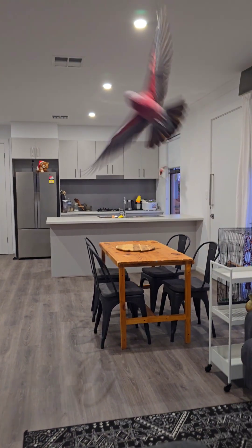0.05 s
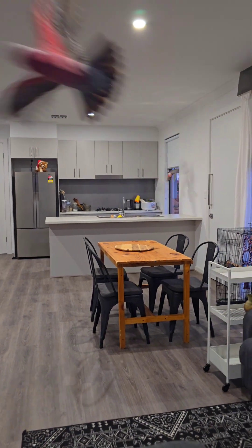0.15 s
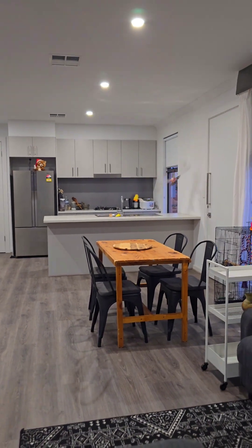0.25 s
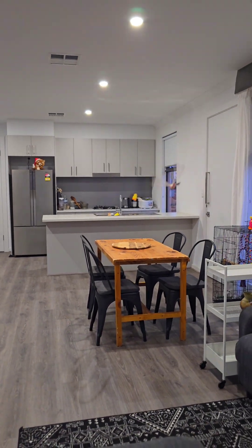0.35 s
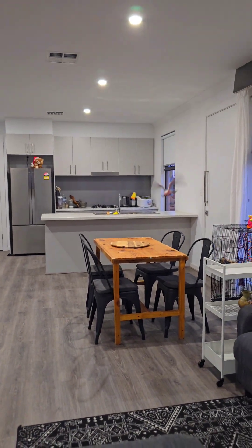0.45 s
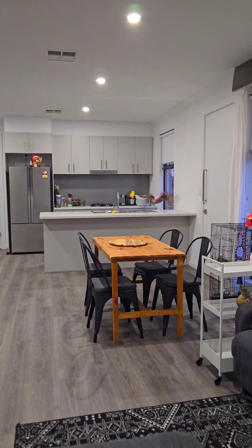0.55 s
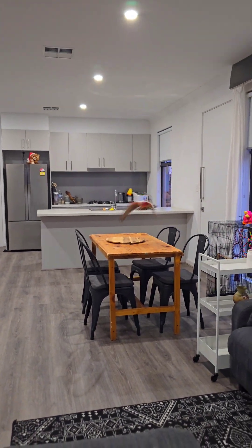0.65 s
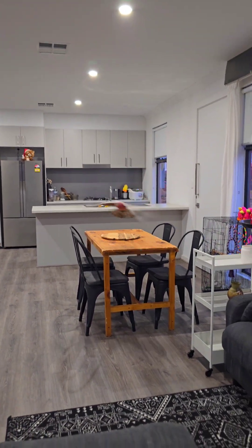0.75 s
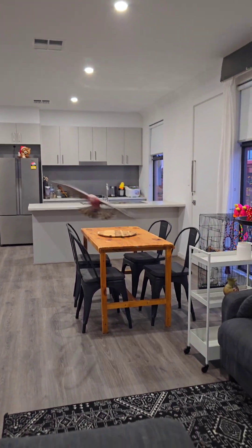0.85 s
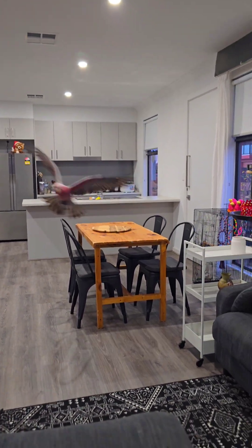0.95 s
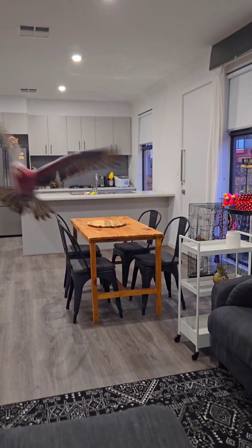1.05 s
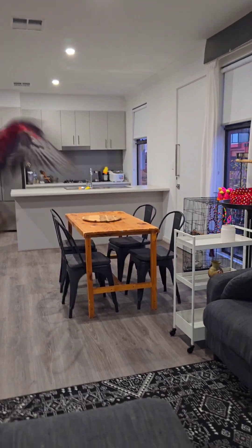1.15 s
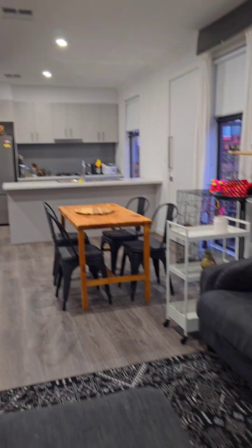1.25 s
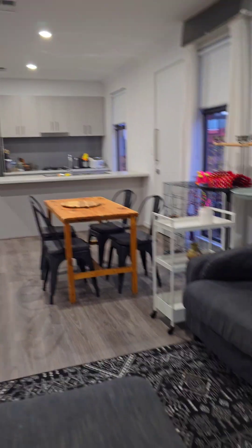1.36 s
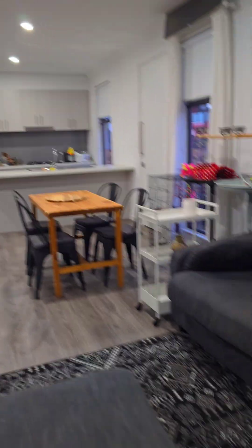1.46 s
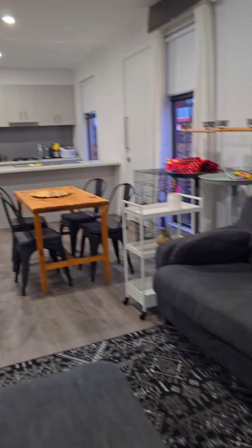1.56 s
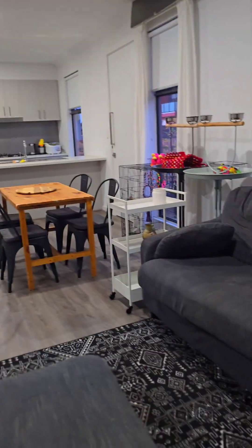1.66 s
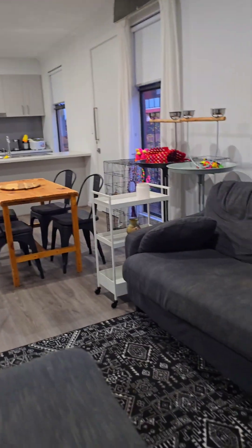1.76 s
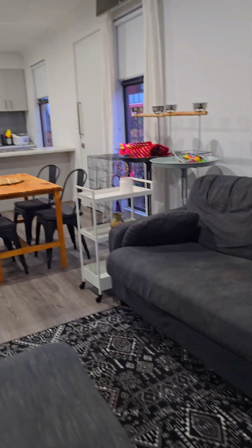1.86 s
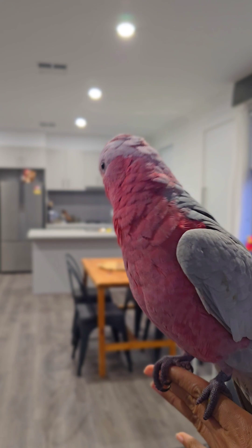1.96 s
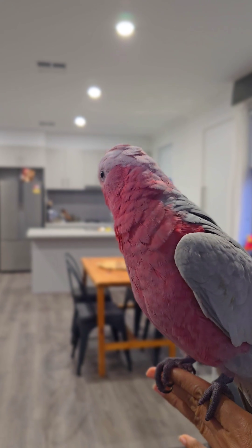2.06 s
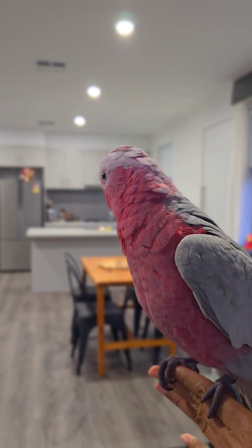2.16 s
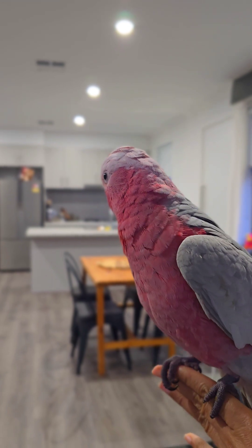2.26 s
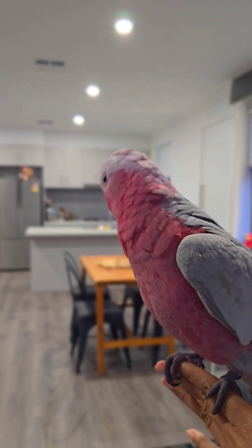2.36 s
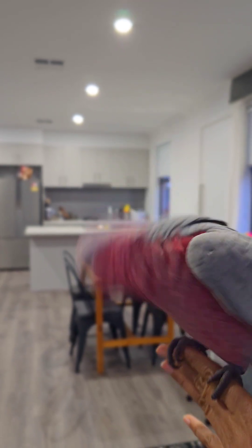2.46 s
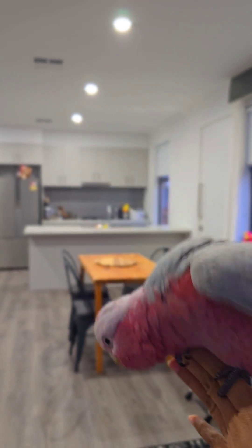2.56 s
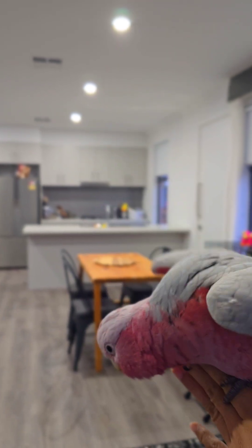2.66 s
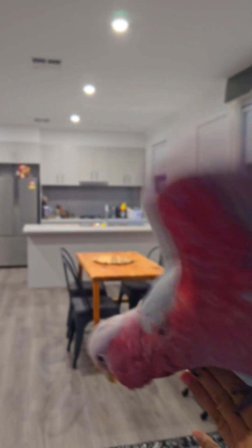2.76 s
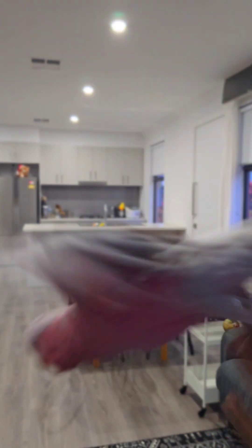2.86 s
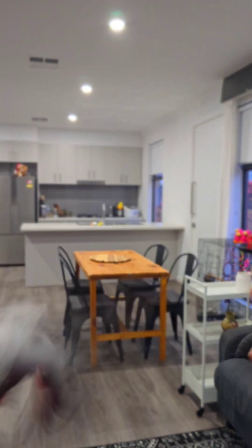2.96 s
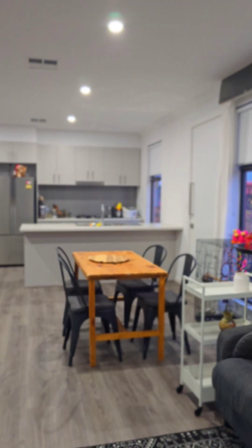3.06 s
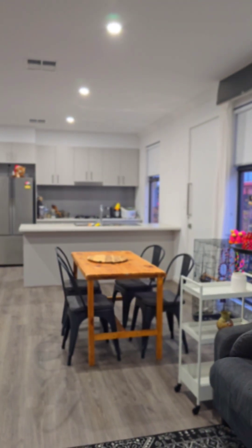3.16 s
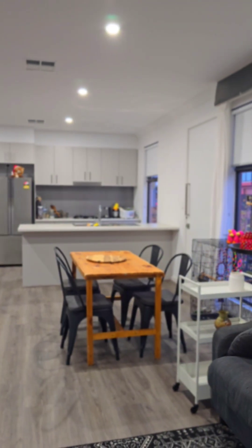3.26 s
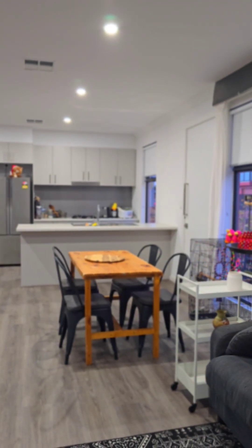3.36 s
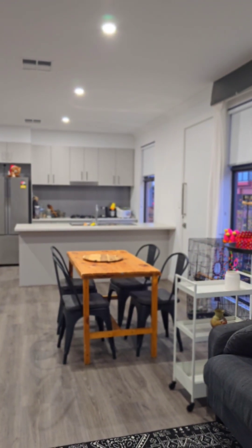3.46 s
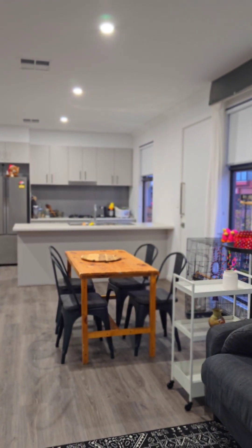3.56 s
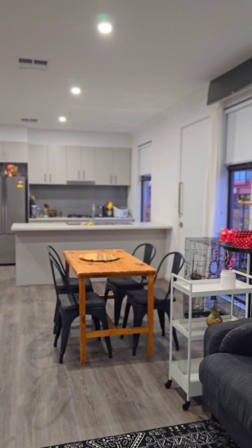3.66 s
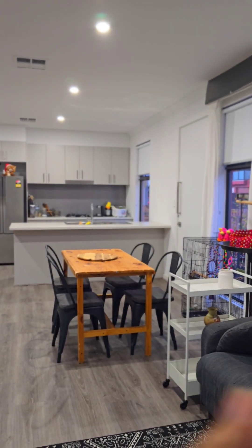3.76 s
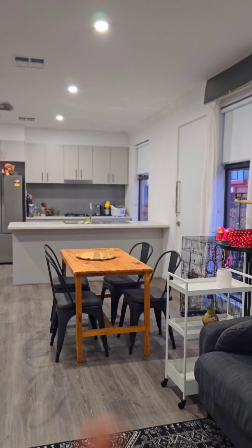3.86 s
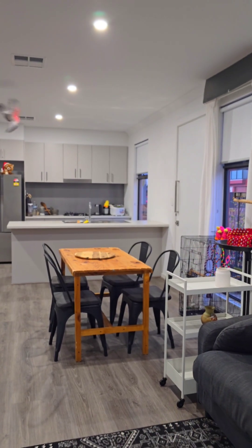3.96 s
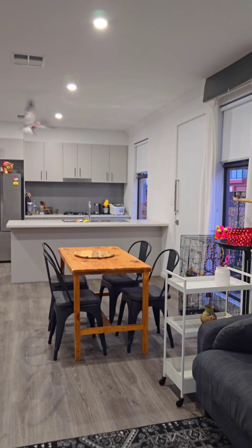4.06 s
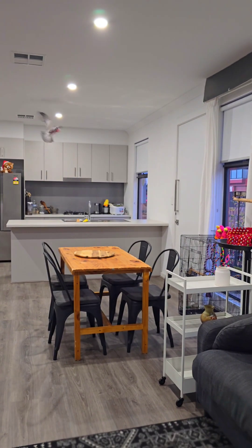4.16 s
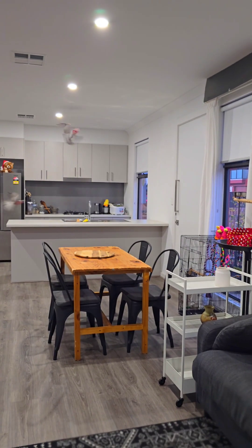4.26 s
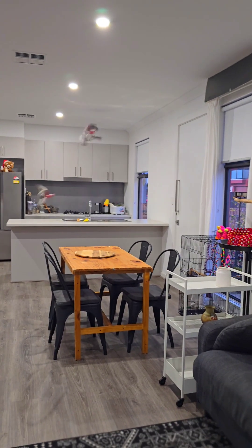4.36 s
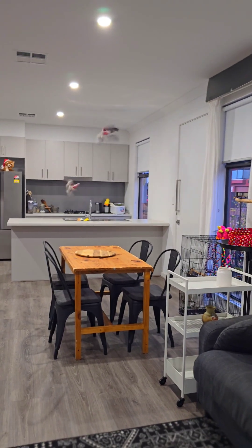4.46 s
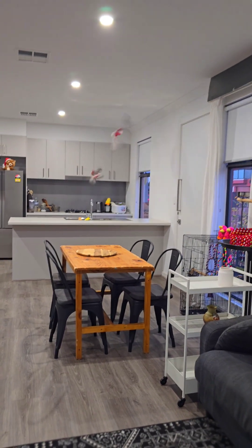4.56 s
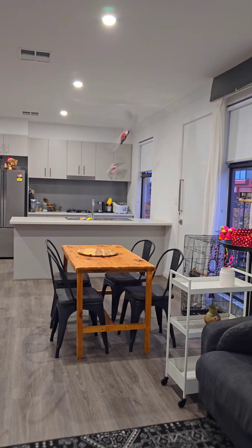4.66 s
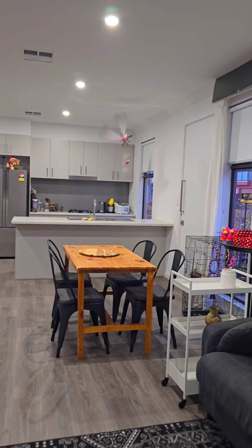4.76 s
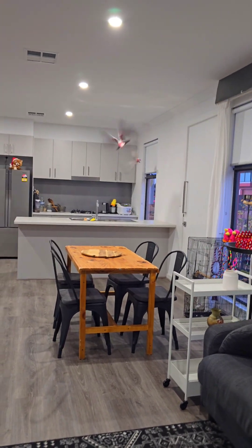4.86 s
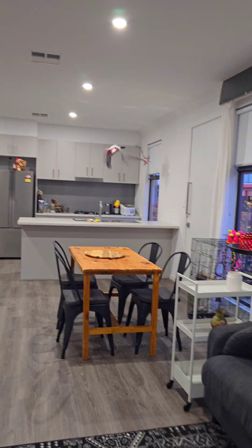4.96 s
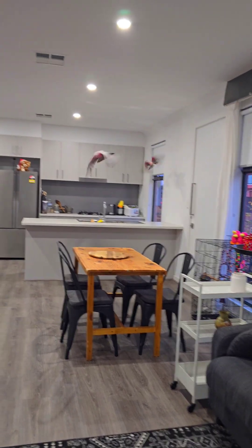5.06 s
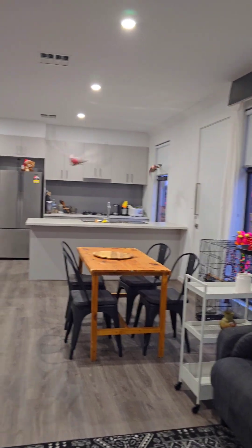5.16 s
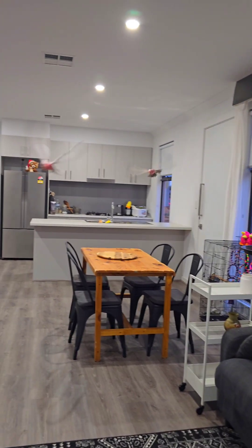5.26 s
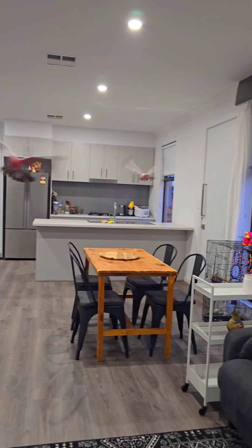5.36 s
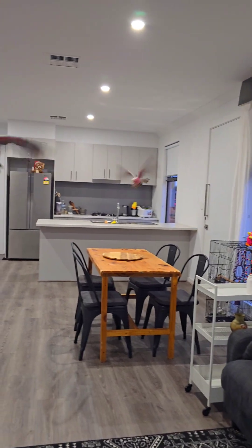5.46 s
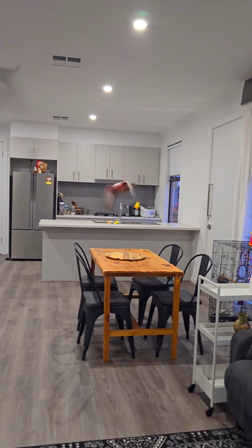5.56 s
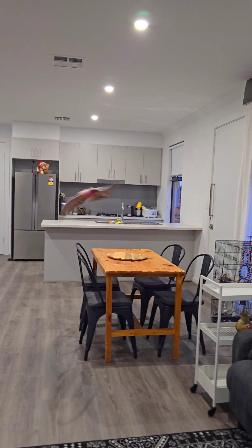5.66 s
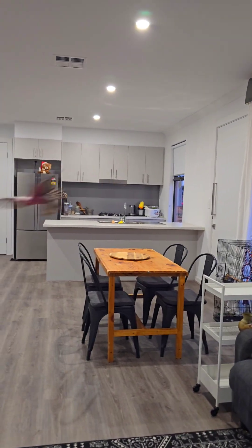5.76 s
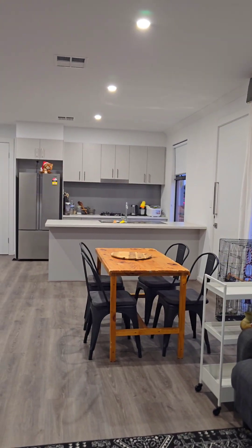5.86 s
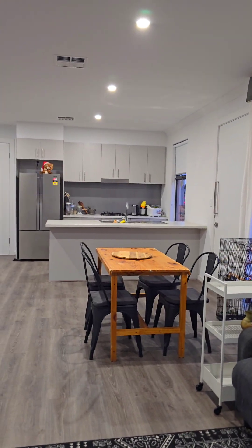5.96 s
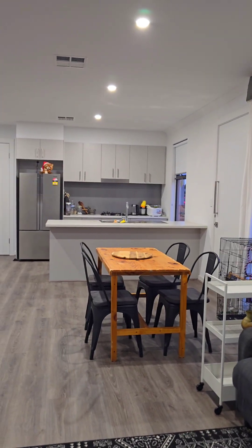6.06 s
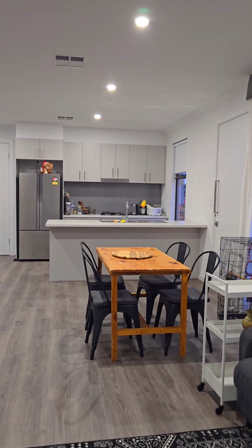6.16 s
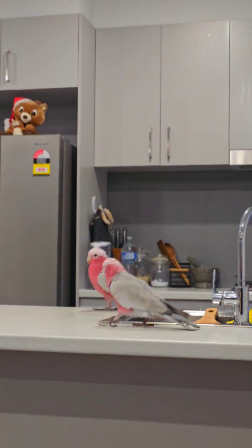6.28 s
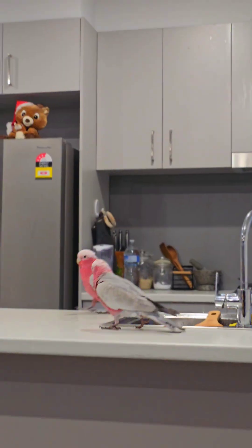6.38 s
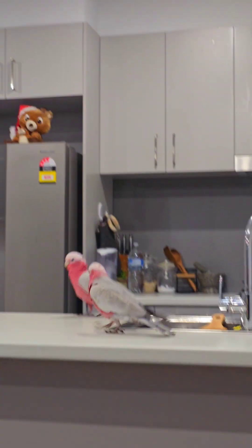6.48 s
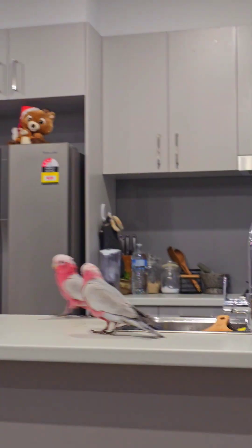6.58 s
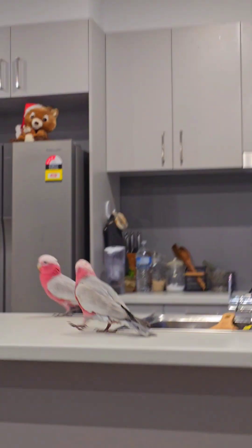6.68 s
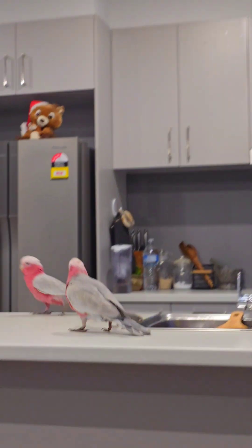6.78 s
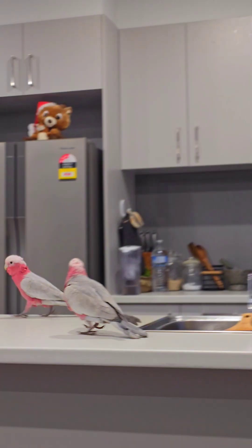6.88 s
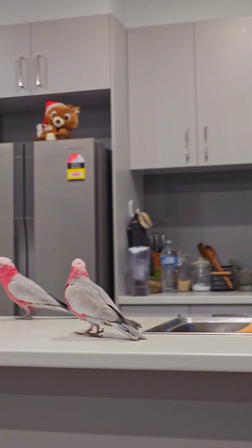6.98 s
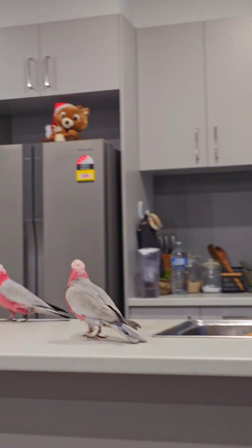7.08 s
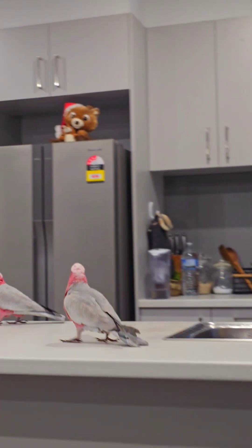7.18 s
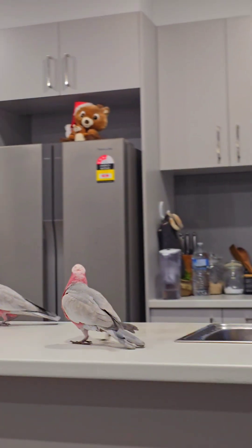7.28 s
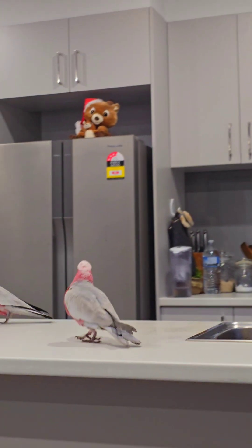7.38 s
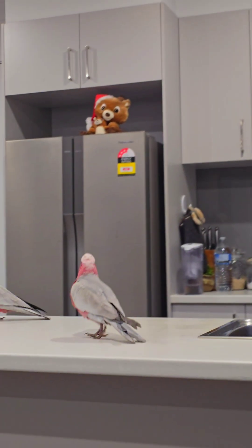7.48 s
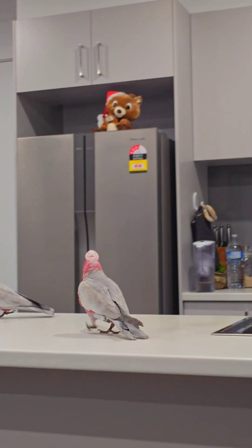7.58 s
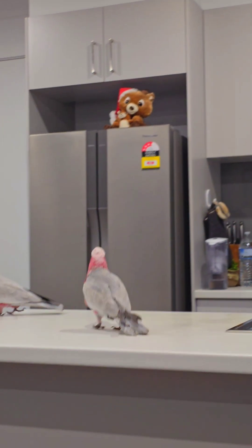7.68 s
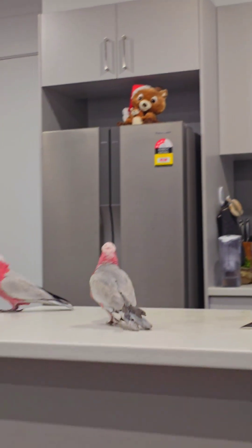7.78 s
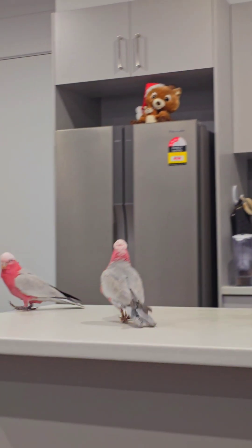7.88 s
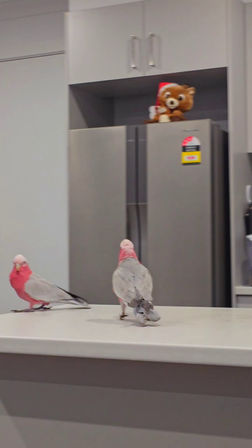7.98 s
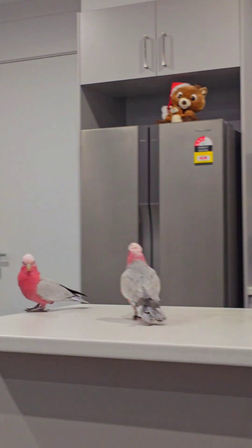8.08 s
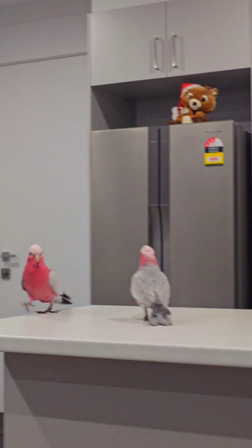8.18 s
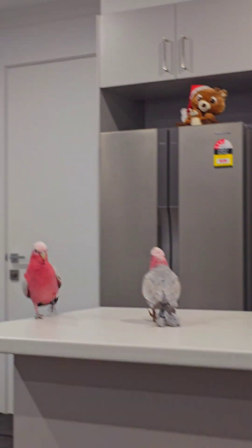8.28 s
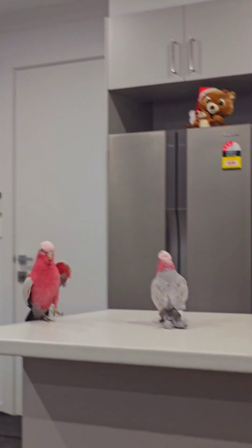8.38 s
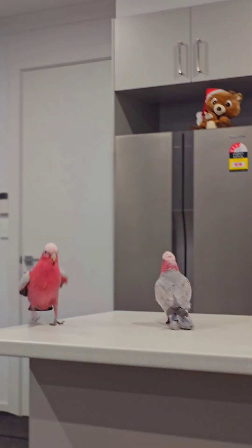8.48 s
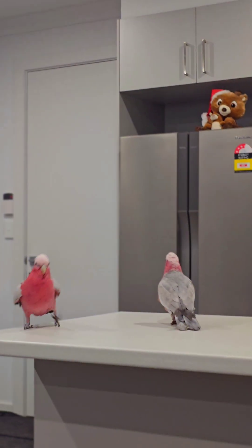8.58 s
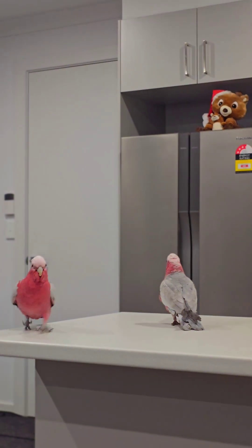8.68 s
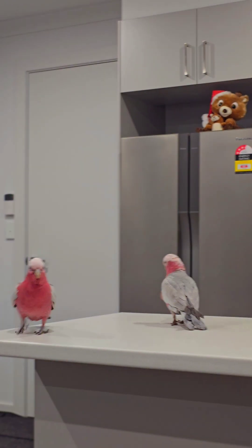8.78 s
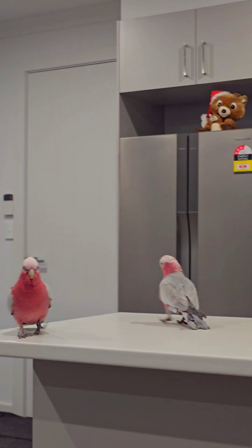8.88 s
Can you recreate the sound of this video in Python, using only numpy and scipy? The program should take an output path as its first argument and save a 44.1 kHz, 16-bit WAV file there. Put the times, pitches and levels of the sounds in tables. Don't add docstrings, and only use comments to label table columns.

```python
import sys
import numpy as np
from scipy import signal
from scipy.fft import rfft, irfft
from scipy.io import wavfile
from scipy.ndimage import uniform_filter1d

SR = 44100
rng = np.random.default_rng(int(sys.argv[2]) if len(sys.argv) > 2 else 0)


def boost(x):
    u = np.asarray(x, float) / 20
    return 10 ** u


def waveform_to_disk(signal):
    frames = np.transpose(np.atleast_2d(signal))
    scaled = np.clip(frames, -1, 1) * 32767
    samples = np.round(scaled).astype(np.int16)
    wavfile.write(sys.argv[1], SR, samples)


N = 393813


def rms_one(x):
    return x / np.sqrt(np.mean(x ** 2) + 1e-20)


def in_time(rows):
    s, *columns = np.transpose(rows)
    return [np.interp(np.arange(N) / SR, s, c) for c in columns]


def colour(x, points):
    hz, db = np.transpose(points)
    grid = np.maximum(np.fft.rfftfreq(x.shape[-1], 1 / SR), 1)
    gain_db = np.interp(np.log(grid), np.log(hz), db)
    return irfft(rfft(x) * boost(gain_db), x.shape[-1])


def band(x, lo_hz, hi_hz):
    return signal.sosfilt(signal.butter(2, [lo_hz, hi_hz], "band", fs=SR, output="sos"), x)


def drift(rate_hz, size=N):
    r = np.exp(-2 * np.pi * rate_hz / SR)
    wander = signal.lfilter([1], [1, -2 * r, r * r], rng.standard_normal(size + SR))
    return rms_one(wander[SR:])


def ring(clicks, hz, t60_s):
    r, w = boost(-60 / (t60_s * SR)), 2 * np.pi * hz / SR
    return signal.lfilter([0, np.sin(w)], [1, -2 * r * np.cos(w), r * r], clicks + 1e-18)


def add(out, s, piece):
    i = max(round(s * SR), 0)
    out[i:i + len(piece)] += piece[:N - i]


def held(rows, edge_s):
    gain = np.zeros(N)
    for s, length_s, level_db in rows:
        add(gain, s, np.full(round(length_s * SR), boost(level_db)))
    return uniform_filter1d(gain, max(round(edge_s * SR), 1))


def stereo_noise(alike):
    mid, side = rng.standard_normal((2, N))
    alike = np.clip(alike, -1, 1)
    return np.sqrt(1 + alike) * mid + np.sqrt(1 - alike) * side * [[1], [-1]]


# f/Hz, level/dB
RASP_SPECTRUM = [(1500, -27.5), (2500, -6), (3500, -6), (5000, -10.5), (8000, 1.8), (10500, -6),
                 (12000, -19.5), (15500, -18)]
# f/Hz, level/dB
RASP_RESONANCES = [(3100, -1), (3950, 5), (5200, -1.3), (6250, -2), (8000, -8.5)]


def rasp_noise():
    air = rms_one(colour(rng.standard_normal(N), RASP_SPECTRUM))
    resonant = 0
    for k, (hz, db) in enumerate(RASP_RESONANCES):
        resonant = resonant + boost(db) * rms_one(ring(air, hz, t60_s=0.0074)) * (-1) ** k
    edge = signal.butter(6, 2040, "high", fs=SR, output="sos")
    return rms_one(signal.sosfilt(edge, rms_one(resonant) + boost(-10) * air))


# t/s, length/s, f start/Hz, f end/Hz, peak level/dB
LOW_NOTES = [(0, 0.025, 3240, 2993, -25), (1.347, .014, 2550, 3050, -9), (1.365, 0.02, 3080, 3262, -5),
             (2.85, 0.02, 2748, 2906, -10.5), (2.869, 0.012, 2932, 3500, -11.5),
             (3.365, 0.043, 3035, 3160, -18), (3.414, .045, 3150, 3118, -17.5),
             (3.458, .06, 3150, 3032, -32.5), (3.692, 0.021, 2742, 2966, -26.5),
             (4.219, 0.023, 2750, 3422, -17), (4.477, 0.019, 2884, 3201, -16),
             (4.912, 0.016, 2940, 3313, -40), (5.169, 0.027, 2882, 2987, -21),
             (5.396, 0.02, 2993, 3428, -20), (5.614, 0.014, 3167, 3235, -17),
             (5.809, 0.048, 2998, 3234, -20)]
MIDDLE_NOTES = [(0, 0.056, 3819, 3899, -14), (0.257, 0.047, 3650, 4145, -15),
                (.302, 0.047, 4117, 4217, -17.5), (1.345, 0.016, 3100, 3760, -10),
                (1.363, 0.012, 3850, 4083, -17), (1.383, 0.048, 4020, 4365, -10),
                (2.845, 0.017, 3075, 3410, -13.5), (2.879, 0.022, 3700, 3936, -12),
                (2.897, .013, 3950, 4790, -14), (3.079, .032, 3581, 3830, -15.5),
                (3.11, 0.05, 3861, 3950, -11.5), (3.155, 0.06, 4209, 4493, -15.5),
                (3.412, .022, 3845, 4120, -7.5), (3.437, .06, 4098, 4050, -17.5),
                (3.705, 0.075, 3736, 4208, -15.5), (4.243, 0.046, 3650, 4030, -9.5),
                (4.287, 0.048, 4096, 4122, -13), (4.5, 0.035, 3820, 4073, -12),
                (4.54, 0.042, 4153, 3975, -6.5), (4.7, 0.067, 3940, 3990, -13.5),
                (4.931, 0.055, 3717, 3965, -15.5), (4.971, .04, 3858, 3758, -19.5),
                (5.178, 0.022, 3700, 4056, -18.5), (5.203, 0.039, 4150, 4044, -13.5),
                (5.402, 0.048, 3600, 3953, -13.5), (5.455, 0.068, 3900, 4081, -15),
                (5.637, 0.064, 3680, 4077, -8), (5.818, 0.025, 3690, 3850, -17.5),
                (5.85, .016, 3990, 4023, -14), (5.867, 0.04, 4012, 3877, -10)]
HIGH_NOTES = [(0, 0.065, 4658, 4585, -33.5), (.325, 0.052, 5387, 4990, -16),
              (1.435, 0.025, 5650, 5815, -16), (1.465, 0.066, 5850, 5320, -13.5),
              (1.525, .087, 5345, 5580, -16.5), (2.908, 0.022, 5123, 5403, -11),
              (2.924, 0.027, 5288, 5008, -9), (3.217, 0.046, 5200, 5130, -16.5),
              (3.753, 0.041, 5070, 5368, -16.5), (4.479, 0.073, 4857, 4690, -25.5),
              (4.754, 0.058, 5451, 4970, -14), (4.975, .065, 5050, 5235, -17.5),
              (5.22, 0.028, 5050, 5120, -17.5), (5.85, 0.024, 4850, 4950, -23),
              (5.44, 0.014, 5220, 5180, -26), (5.703, 0.02, 5407, 5380, -19.5)]
STRANDS = [(.0, .04, 5520, 5450, -30), (0.244, .02, 4324, 4356, -31), (1.465, 0.018, 3500, 3750, -31.5),
           (5.62, 0.0086, 3190, 3550, -15), (3.425, 0.025, 4300, 4520, -25.5),
           (1.385, 0.025, 4854, 5097, -20), (1.425, .03, 3300, 3500, -24), (1.462, 0.021, 4523, 4700, -25),
           (1.501, .045, 4300, 4000, -30), (3.07, .016, 6394, 6760, -16.5), (3.11, .04, 6400, 6640, -33.5),
           (3.222, .035, 6133, 6240, -23), (4.474, 0.047, 5488, 5575, -25), (4.992, .03, 6250, 6160, -28.5),
           (5.166, 0.024, 5860, 6100, -24.5), (5.824, 0.025, 4475, 4700, -19)]
# start level/dB, peak position/share of length, end level/dB, octave level/dB
SWELLS = [
    (-9, 0.062, -2, -3.5),
    (-0.5, 0.98, 6.5, -8.5),
    (-1.5, 1, -11.5, -17.5),
    (-1.5, 0.55, -9, -14),
]
# t/s, roughness/0-1
ROUGHNESS = [(0, .3), (.2, .5), (1.3, .35), (1.43, .5), (1.5, .05), (2.8, .15), (2.96, .2), (3.05, .5),
             (3.8, .45), (4.3, .35), (4.75, .4), (5.25, .45), (5.4, .9), (5.55, .7), (5.63, .25),
             (5.9, .15)]


def whistles(shrill_db):
    out = np.zeros(N)
    rough = in_time(ROUGHNESS)[0]
    waver = 1 + (.005 + .015 * rough) * drift(150)
    buzz = np.sin(2 * np.pi * np.cumsum(640 + 90 * drift(40)) / SR)
    tremor_db = (1 + 3 * rough) * drift(170) + 4 * rough * drift(45)
    tremor = boost(tremor_db) * (1 + .6 * rough * buzz)
    breath = boost(-13) * rough * rasp_noise()
    registers = (LOW_NOTES, MIDDLE_NOTES, HIGH_NOTES, STRANDS)
    for notes, (start_db, peak_at, end_db, octave_db) in zip(registers, SWELLS):
        gain, pitch = np.zeros(N), []
        peak_at = np.clip(peak_at, .1, .9)
        for s, length_s, from_hz, to_hz, peak_db in notes:
            share = np.arange(0, 1, 1 / (length_s * SR))
            swell_db = np.interp(share, [0, peak_at, 1], [start_db, 0, end_db])
            add(gain, s, boost(peak_db + swell_db))
            middle_hz = from_hz + .62 * (to_hz - from_hz)
            pitch += [(s + .001, from_hz), (s + length_s / 2, middle_hz), (s + length_s - .001, to_hz)]
        phase = 2 * np.pi * np.cumsum(in_time(sorted(pitch))[0] * waver) / SR
        upper = np.sin(3 * phase) + .7 * np.sin(4 * phase)
        overtones = np.sin(2 * phase) + boost(shrill_db - 14) * upper
        tone = np.sin(phase) + boost(octave_db + shrill_db) * overtones * tremor ** .5
        note_edge_s = 0.0066
        out += uniform_filter1d(gain, round(note_edge_s * SR)) * (tone + breath) * tremor
    return out


# band top f/Hz, t60/s, level/dB
ROOM_BANDS = [(620, 0.18, 0.6), (2590, 0.71, 6), (6100, 0.61, 3.5), (9260, 0.52, 3.5), (11300, 0.13, 5.5),
              (12700, 0.36, 5.5), (17400, 0.25, 12.5)]


def room(x):
    t, tail, lo_hz = np.arange(round(1.3 * SR)) / SR, 0, 40
    onset = np.clip((t - .004) / 0.00093, 0, 1)
    for hi_hz, t60_s, level_db in ROOM_BANDS:
        dying = band(rng.standard_normal((2, len(t))), lo_hz, hi_hz) * boost(-60 * t / t60_s)
        tail = tail + boost(level_db - 40) * dying * onset
        lo_hz = hi_hz
    return signal.fftconvolve(x[None], tail, axes=1)[:, :N]


# t/s, level/dB
WINGS = [(0, -46.5), (.42, -55.5), (1.15, -53.5), (1.36, -48), (1.86, -51.5), (2.11, -53), (2.16, -59),
         (2.7, -58), (3.16, -41), (3.56, -44), (4.1, -56.5), (4.7, -40.5), (5.1, -48.5), (6.0, -56.5),
         (6.1, -49), (6.45, -52.5), (6.53, -66.5)]


def wing_effort():
    return boost(in_time(WINGS)[0])


# t/s, peak level/dB, fade/s
GUSTS = [(0.098, -58.5, 0.33), (0.379, -51, 0.072), (.9, -59, 0.16), (1.358, -36, .03), (1.45, -48, 0.028),
         (1.541, -23.5, 0.025), (1.61, -34.5, .03), (1.76, -40.5, 0.093), (2.022, -41.5, 0.066),
         (2.961, -28.5, 0.04), (3.34, -35.5, 0.033), (3.598, -52.5, 0.24), (4.7, -50, 0.39),
         (5.6, -63, 0.24), (6.34, -56, 0.091), (7, -64, 0.32), (8.2, -58, 0.15)]


def flight(wings):
    t = np.arange(N) / SR
    still_air_db = -72.5
    air = boost(still_air_db) + sum(boost(db) * np.exp(-abs(t - s) / fade_s) for s, db, fade_s in GUSTS)
    draught = rms_one(band(band(stereo_noise(0.1), 38, 50), 15, 77)) * air
    buffet = rms_one(band(band(stereo_noise(0.0), 77, 120), 60, 220))
    draught += buffet * boost(10) * air ** 1.5
    draught = draught * boost(3 * drift(9))
    throb = rms_one(band(band(stereo_noise(0.76), 190, 300), 120, 500)) * boost(-2.5 + 2.5 * drift(11))
    throb += boost(-10.5) * rms_one(band(band(stereo_noise(0.87), 72, 170), 70, 200))
    shuffle_s, shuffle_span_s, shuffle_db = 7.73, 0.69, -71
    shuffle = boost(shuffle_db) * np.exp(-((t - shuffle_s) / shuffle_span_s) ** 2)
    return draught * boost([[2.5], [-2.5]]) + throb * (wings + shuffle)


# f/Hz, level/dB
HUM_SPECTRUM = [(180, -45.5), (300, -5), (581, -7), (669, -8), (1040, -12), (1630, -11), (4000, -27.5),
                (5200, -57), (8800, -120)]
# f/Hz, level/dB
HISS_SPECTRUM = [(1470, -26.4), (2500, -1), (3050, 0.8), (8330, -1.5), (9710, -11.5), (11900, -2.5),
                 (14900, -9.5), (15600, -16)]
# t/s, level/dB
GAIN = [(0, 11), (1.1, 0.5), (1.3, 11.5), (2.05, 1.5), (2.8, -15.5), (3.0, 4.5), (4.2, -2), (6.0, 3),
        (7.55, 4.5), (7.75, -3.5), (8.28, -7.5), (8.93, 4.5)]


def background(birds, wings):
    still_db, wings_db, calls_db, linger_s = -64.5, -5.5, -33.5, 0.025
    r = np.exp(-2 / (linger_s * SR))
    call_power = signal.lfilter([1 - r], [1, -r], birds ** 2)
    stirred = boost(2 * calls_db) * call_power + (boost(wings_db) * wings) ** 2
    hum = np.sqrt(boost(2 * still_db) + stirred) * rms_one(colour(stereo_noise(0.4), HUM_SPECTRUM))
    gain = boost(in_time(GAIN)[0])
    return hum + boost(-63) * gain * rms_one(colour(stereo_noise(0.033), HISS_SPECTRUM))


# t/s, peak level/dB, pulse f/Hz, length/s, rasp level/dB
CROAKS = [(0.211, -27.5, 667, 0.037, -34.5), (0.372, -27.5, 750.6, 0.031, -32),
          (1.34, -26, 620, 0.022, -22), (1.436, -38.5, 998.6, .05, -44), (2.826, -16.5, 554, 0.021, -25),
          (3.034, -24, 679, 0.045, -28), (3.202, -34.5, 970, .05, -39), (3.236, -28.5, 887, 0.035, -25.5),
          (3.435, -40.5, 900, 0.046, -48), (5.234, -35, 966, .04, -52.5), (5.522, -32.5, 828.5, 0.031, -44),
          (3.322, -31.5, 680.4, 0.048, -27.5), (3.677, -31, 578.6, 0.021, -24),
          (4.184, -35, 602, 0.058, -33), (4.434, -31, 627.4, 0.035, -19), (4.691, -31, 686, 0.021, -20),
          (4.903, -30.5, 633, 0.03, -19), (5.133, -32, 615, 0.046, -20), (5.356, -29.5, 646, 0.03, -18),
          (5.594, -26, 644.6, 0.028, -18.5), (5.797, -26.5, 707.4, 0.036, -23)]
# f/Hz, level/dB
THROAT = [(350, -10.5), (600, -5.5), (1200, -2), (1750, -2.5), (2200, -9.5), (3200, -2.5), (6000, -14.5),
          (9000, -32), (15000, -33.5)]
# t/s, length/s, level/dB
RASPS = [(.242, .05, -26), (.36, 0.043, -31), (1.334, .012, -36), (1.35, 0.026, -24.5),
         (1.39, 0.044, -25.5), (1.445, 0.041, -27), (3.062, 0.042, -28.5), (3.14, .09, -36),
         (3.36, 0.071, -28), (3.43, 0.035, -29), (4.48, 0.06, -22.5), (4.93, 0.028, -28.5),
         (5.17, 0.048, -28.5), (5.385, 0.061, -21.5), (5.81, 0.041, -24)]


def croaks():
    pulses, breath = np.zeros(N), np.zeros(N)
    for s, peak_db, hz, length_s, rasp_db in CROAKS:
        t = np.arange(0, length_s, 1 / SR)
        jitter = drift(500, size=SR // 10)[:len(t)]
        pulse_hz = hz * (.9 + 0.19 * t / length_s + 0.078 * jitter)
        phase = 2 * np.pi * np.cumsum(pulse_hz) / SR
        stack = sum(np.cos(k * phase) for k in range(1, 22))
        add(pulses, s, boost(peak_db - 2) * stack * np.sin(np.pi * (t / length_s) ** 1.5))
        t = np.arange(0, .15, 1 / SR)
        add(breath, s + 0.45 * length_s, boost(rasp_db) * np.minimum(t / .011, 1) * np.exp(-t / .05))
    rasp = rasp_noise() * boost(1.0 * drift(300))
    spit = boost(1.8) * breath ** 2 * band(rng.standard_normal(N), 8500, 15500)
    return colour(pulses, THROAT) + (breath + held(RASPS, edge_s=.008)) * rasp + spit


# t/s, peak level/dB
SCUFFS = [(0.9194, -50), (1.2317, -55), (1.3076, -56), (1.7194, -40), (1.8794, -49), (1.9805, -47.5),
          (2.1991, -61), (2.2682, -50), (2.3294, -47.5), (2.4494, -55.5), (2.7594, -62), (6.5162, -47),
          (6.76, -40), (6.9106, -42.5), (7.0569, -40.5), (7.205, -46.5), (7.2694, -47), (8.3311, -55),
          (8.3519, -45.5), (8.3857, -44), (8.544, -42.5), (8.7061, -46.5), (8.8463, -37)]
# t/s, peak level/dB
TICKS = [(6.5545, -35.5), (7.0174, -38.5), (7.4944, -42), (7.9638, -45.5), (8.1994, -55), (8.4394, -42),
         (8.7494, -49.5), (8.7675, -46.5)]
# f/Hz, level/dB
SCUFF_SPECTRUM = [(1180, -51), (2000, -17.5), (4490, -13.5), (5330, -6), (6720, -9.5), (8410, -7.5),
                  (9560, -22), (12100, -14), (15600, -18.5)]


def scuffs():
    stroke = np.zeros(N)
    for events, rise_s in ((SCUFFS, .011), (TICKS, .0015)):
        t = np.arange(0, 10 * rise_s, 1 / SR) / rise_s
        for s, peak_db in events:
            add(stroke, s, boost(peak_db - 8.5) * t * np.exp(1 - t))
    return stroke * boost(2.0 * drift(250)) * rms_one(colour(stereo_noise(.3), SCUFF_SPECTRUM))


# t/s, peak level/dB
SNAPS = [(1.311, -43.5), (1.462, -43.5), (1.541, -46.5), (1.583, -39), (1.64, -65), (1.665, -45),
         (1.678, -54), (1.694, -44), (1.722, -51), (1.745, -68), (1.772, -45), (1.795, -44), (1.824, -42),
         (1.926, -50), (1.963, -44), (1.995, -59), (2.046, -67), (2.085, -43.5), (2.114, -66), (2.938, -50),
         (2.989, -31)]


def snaps():
    out, t = np.zeros(N), np.arange(0, .012, 1 / SR)
    for s, peak_db in SNAPS:
        burst = rng.standard_normal(len(t))
        add(out, s, boost(peak_db + 19.0) * burst * np.exp(-t / 0.0023))
    return band(out, 120, 1400)


# t/s, length/s, level/dB
RUSTLES = [
    (1.87, .03, -65),
    (2.755, 0.063, -60),
    (2.99, .012, -41.5),
]


def rustles():
    grain = boost(2 * drift(200)) * rms_one(band(rng.standard_normal(N), 1300, 4200))
    return held(RUSTLES, edge_s=0.016) * grain


# t/s, peak level/dB
KNOCKS = [
    (7.336, -19),
    (7.633, -29.5),
    (7.826, -32.5),
]
# f/Hz, level/dB, t60/s
PANEL_MODES = [(197, -4.5, 0.3), (381, -2, 0.18), (632, -5, 0.072), (1062, 3, 0.027), (1520, 0, .018),
               (1924, 9.5, .012), (2120, 2, .012), (2560, 5, .03), (2810, -8, .03), (3660, -16, .02),
               (1725, -7, .04)]


def knocks():
    out, t = np.zeros(N), np.arange(0, .2, 1 / SR)
    touch = np.pad(np.hanning(8), (0, len(t) - 8)) / 3.5
    touch = touch + .5 * (np.arange(len(t)) == 130)
    for s, peak_db in KNOCKS:
        modes = 0
        for hz, db, t60_s in PANEL_MODES:
            t60_s = min(t60_s, 45 * (hz / 390) ** -.6 / hz)
            modes = modes + boost(db + rng.normal(0, 2)) * ring(touch, hz, t60_s)
        crack = rng.standard_normal(len(t)) * np.minimum(t / .003, 1) * np.exp(-t / .012)
        body = band(modes / abs(modes).max() + .3 * crack, 130, 4500)
        body = band(body, 150, 1500 * boost(0.8 * (peak_db + 30.5)))
        bright = boost(2.0 * (peak_db + 39.5) - 45.5) * band(crack, 1400, 7800)
        add(out, s, boost(peak_db) * (0.067 * rms_one(body) + bright))
    return out


# t/s, peak level/dB, f/Hz
PATS = [(7.983, -47, 850), (8.025, -54, 800), (8.06, -58, 1160), (8.445, -44, 770), (8.769, -38.5, 880),
        (8.776, -38, 514), (8.77, -42, 1526), (8.849, -40.5, 1510)]
# t/s, peak level/dB, f/Hz, t60/s
THUDS = [(7.983, -40.5, 117, 0.31), (8.021, -34.5, 119, 0.066), (8.089, -39, 112.6, 0.2),
         (8.151, -45.5, 116, .15), (8.221, -44, 114, 0.3), (8.766, -27.5, 119, 0.12)]


def footfalls():
    out, t = np.zeros(N), np.arange(0, .2, 1 / SR)
    for s, peak_db, hz in PATS:
        add(out, s, boost(peak_db) * band(ring(t == 0, hz, t60_s=0.0142), 200, 1900))
    click = np.arange(SR // 2) == 150
    for s, peak_db, hz, t60_s in THUDS:
        modes = ring(click, hz, t60_s) + 0.47 * ring(click, 1.635 * hz, 0.36 * t60_s)
        add(out, s, boost(peak_db - 3.0) * modes)
        rumble = rms_one(band(band(rng.standard_normal(len(t)), 130, 330), 60, 950)) * np.exp(-t / .17)
        add(out, s + 0.0029, boost(peak_db - 15) * rumble)
    return out


# t/s, left minus right level/dB, direct over room level/dB, shrillness level/dB
BIRD_PATH = [(0, 3, -4.5, -0.5), (.8, 9, -8, -3.5), (1.3, 5, 16.5, -18), (1.42, 8.5, 4.5, -5.5),
             (1.47, 15.5, 8.5, -29.5), (1.5, 27.5, -2.5, -39.5), (1.62, 17.5, 3, -40.5), (2.8, 6, 10, -4),
             (2.93, 17.5, -6, -1.5), (3.1, 4.5, 1, -3.5), (3.4, 7, -2, -2.5), (4.0, 6, -6, -4.5),
             (4.6, 6.5, -7, 0), (5.3, 5, -4, -5), (5.65, 8.5, -2, 0), (5.9, 10.5, -1, 4)]


def scene():
    pan_db, near_db, shrill_db = in_time(BIRD_PATH)
    wings = wing_effort()
    whistle, croak = whistles(shrill_db), croaks()
    birds = whistle + croak
    lead = 12
    early = np.pad(whistle[lead:], (0, lead))
    near = np.array([early * boost(pan_db / 2), whistle * boost(-pan_db / 2)])
    croak_pan_db = 0.44 * pan_db
    near += croak * boost([croak_pan_db / 2, -croak_pan_db / 2])
    far = room(birds * boost(-near_db)) * boost([0.037 * pan_db, -.31 * pan_db])
    knock, snap, scuff = knocks() + footfalls(), snaps() + rustles(), scuffs()
    small = knock * boost([[-1.5], [.8]]) + snap * boost([[3.5], [-3.5]])
    small = small + room(1.98 * knock + 0.17 * snap + 0.54 * scuff[0])
    air = flight(wings) + background(birds, wings)
    return near * boost(np.minimum(near_db, 0) / 2) + far + small + scuff + air


# f/Hz, level/dB
MICROPHONE = [(20, 2.93), (8000, -2.89), (9800, 3), (11500, -0.34), (16000, 1.5)]


def microphone(dry):
    ports = colour(np.pad(dry, ((0, 0), (0, 4000))), MICROPHONE)[:, :N]
    ports = np.tanh(ports / .95) * .95
    return signal.sosfilt(signal.cheby2(16, 50, 15850, fs=SR, output="sos"), ports)


def low_pass(x):
    return signal.sosfilt(signal.butter(12, 15760, fs=SR, output="sos"), x)


def record(dry):
    mix = microphone(dry)
    return low_pass(mix)


dry = scene()
out = record(dry)
waveform_to_disk(out)
```